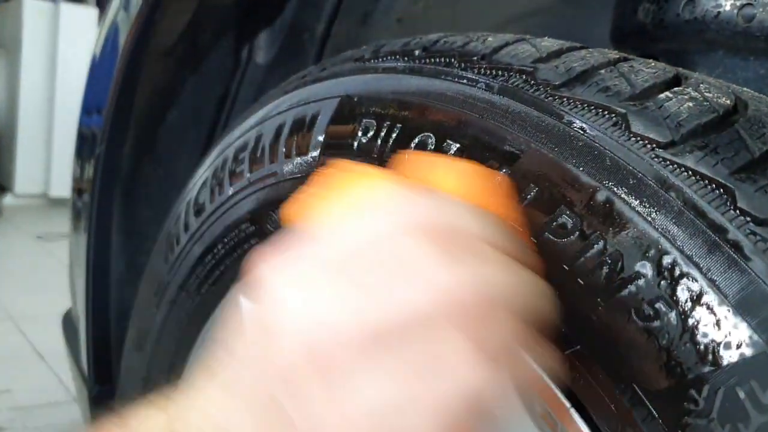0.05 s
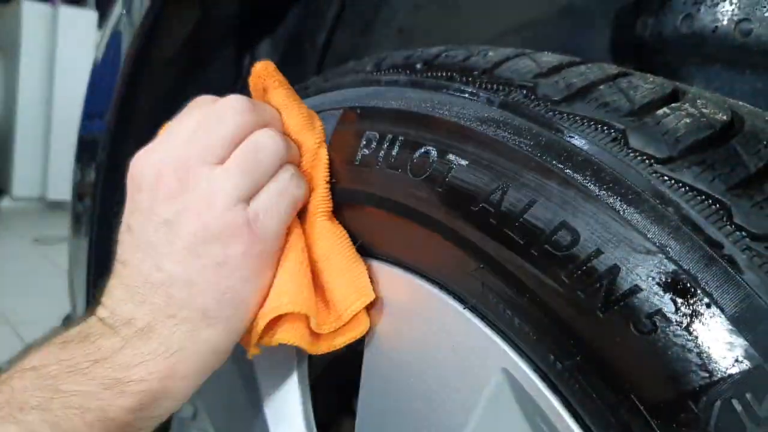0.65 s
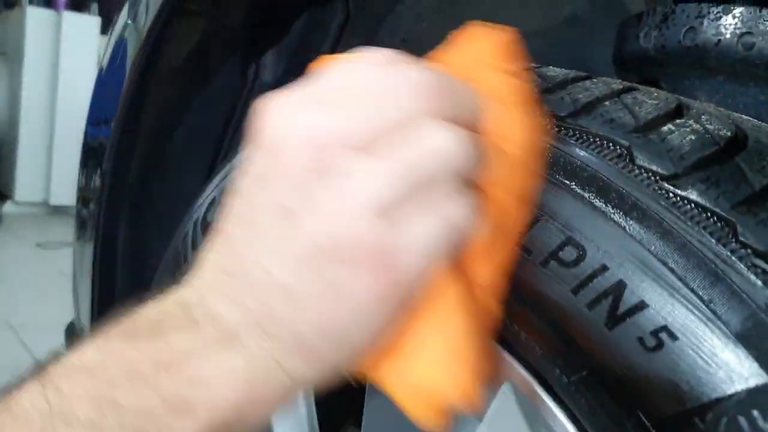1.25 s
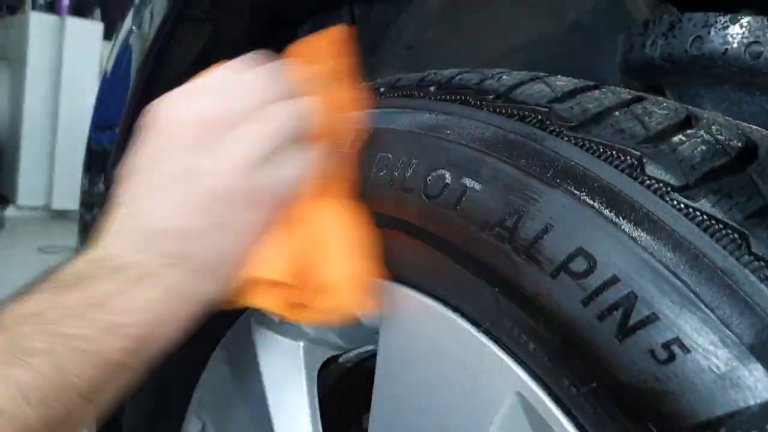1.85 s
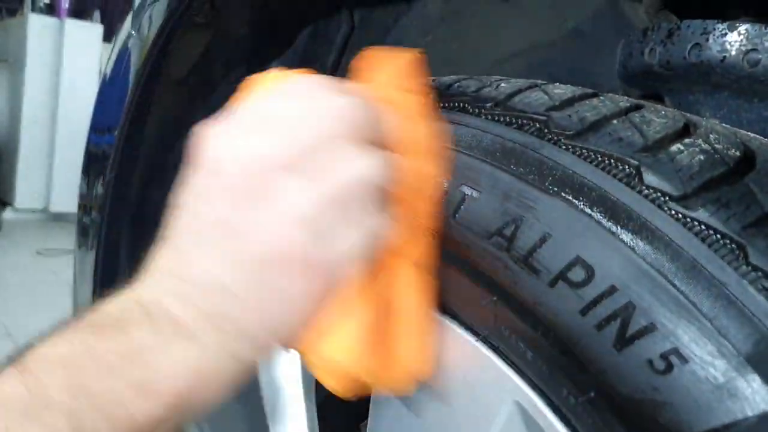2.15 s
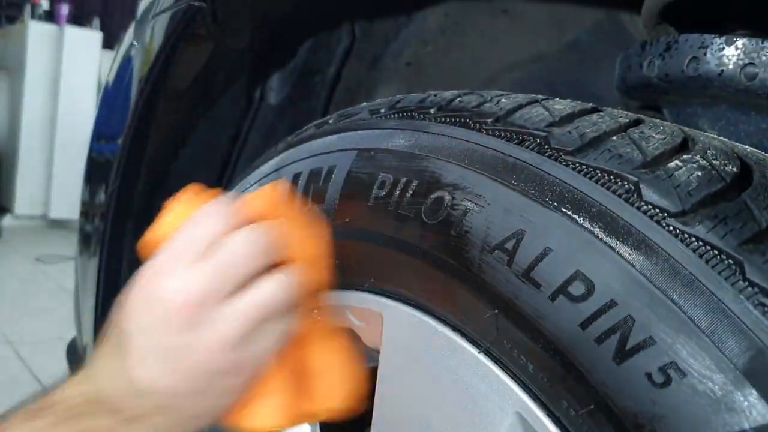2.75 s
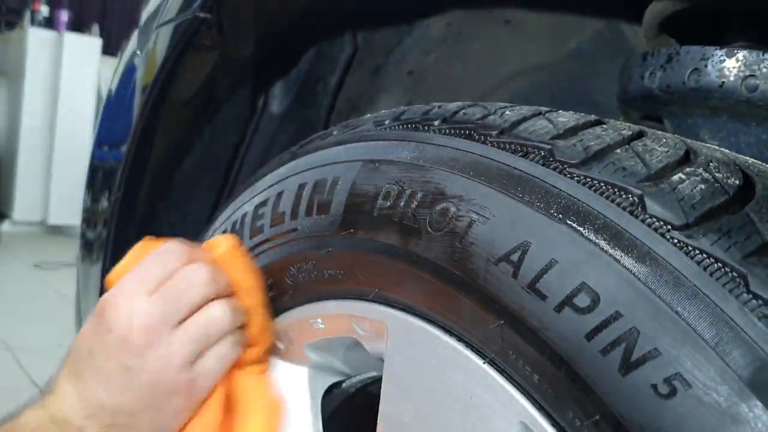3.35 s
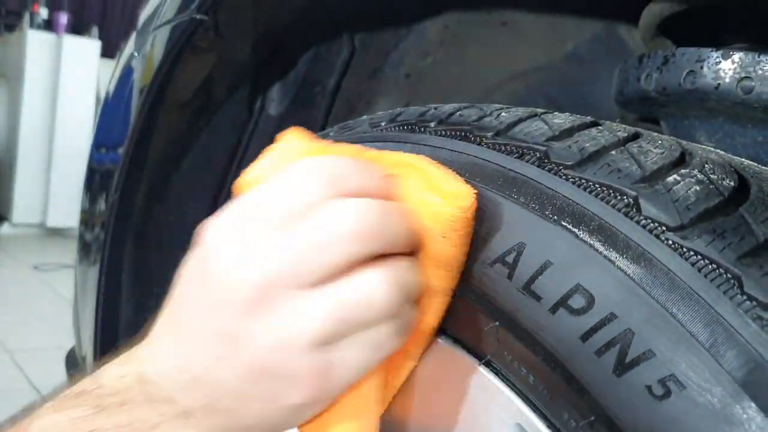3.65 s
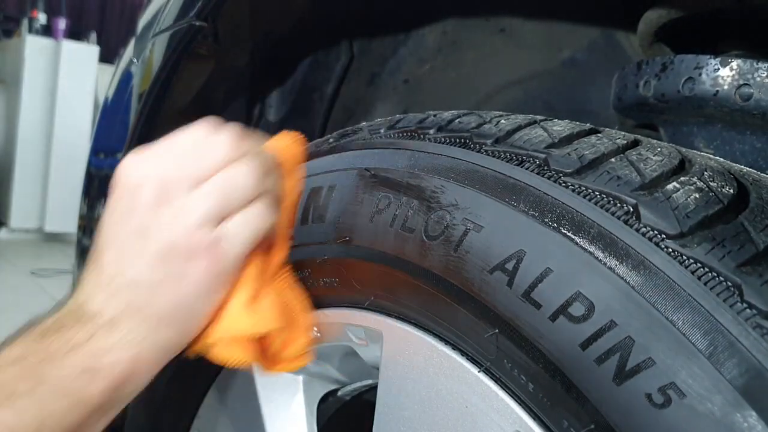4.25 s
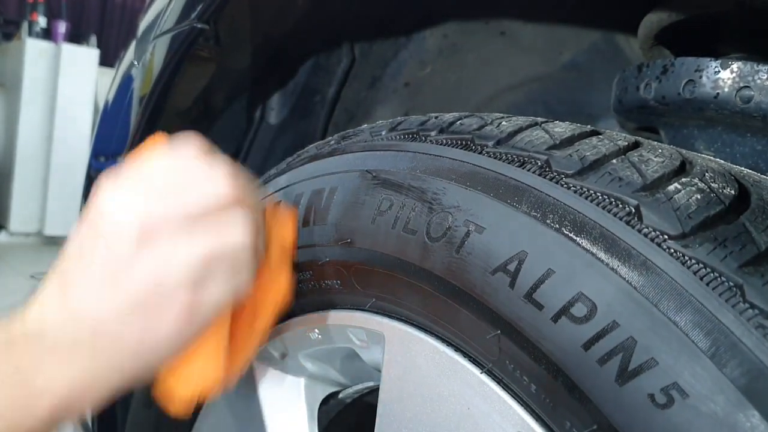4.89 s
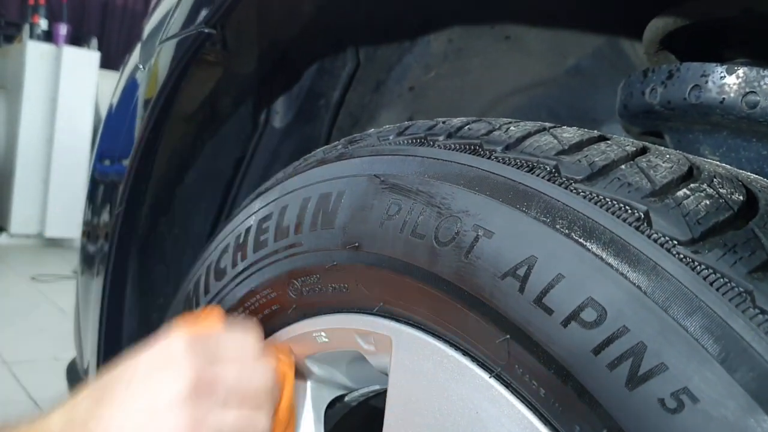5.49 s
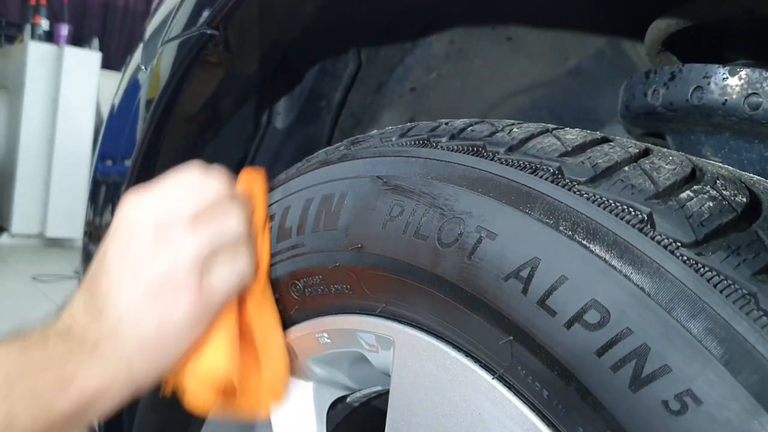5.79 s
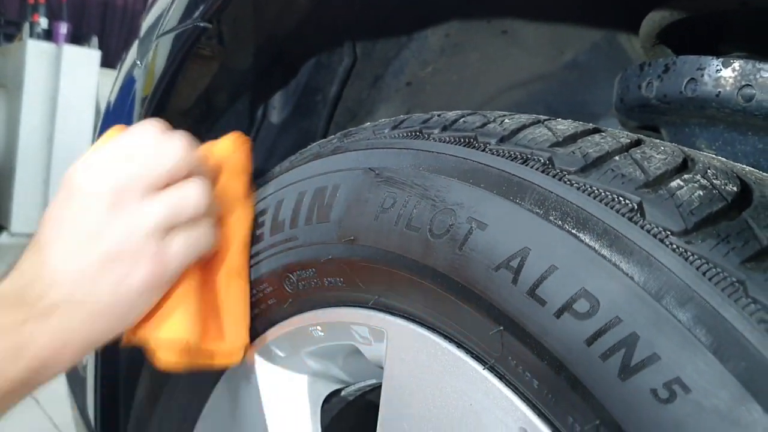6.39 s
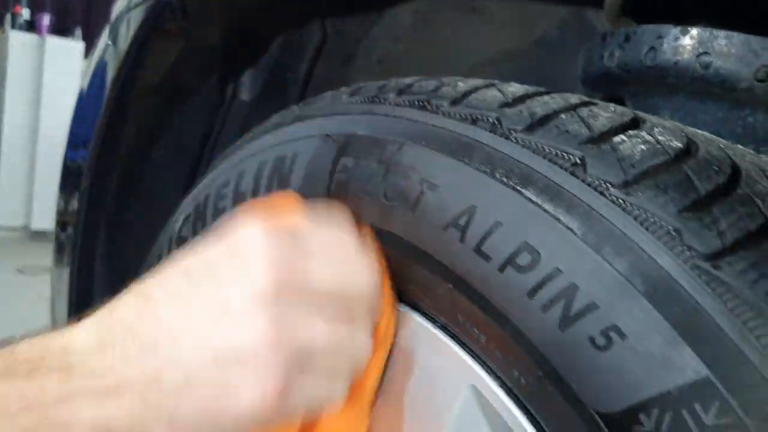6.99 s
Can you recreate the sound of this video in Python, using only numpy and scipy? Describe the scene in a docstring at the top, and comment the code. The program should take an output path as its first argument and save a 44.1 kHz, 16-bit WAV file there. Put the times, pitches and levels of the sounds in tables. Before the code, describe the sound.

A cloth is rubbed quickly to and fro over a wet rubber tyre, close and to the left. Each stroke gives a high squeak that rises and falls in pitch, over a swish and a fine hiss. After about four seconds the squeaks give way to quieter, drier wipes and short scuffs, with one sharp catch near the end. Moving air rumbles softly on the right microphone, and the workshop adds a slight echo.

```python
"""Rubber squeaks on the left as a cloth is rubbed to and fro over a wet tyre in a workshop.
The rubber sticks and slips, so each squeak rises and falls in pitch with the speed of the hand.
Under the squeaks the cloth swishes, its fibres hiss and the wet film gives a few tiny ticks.
Later strokes mostly swish and scuff. Moving air rumbles on the right microphone."""
import sys
import numpy as np
from scipy import signal
from scipy.fft import rfft, irfft, next_fast_len
from scipy.io import wavfile
from scipy.ndimage import map_coordinates

SR = 44100
rng = np.random.default_rng(int(sys.argv[2]) if len(sys.argv) > 2 else 0)


def master(y):
    """Save y as 16-bit WAV."""
    cut = np.clip(np.atleast_2d(y).T, -1, 1)
    pcm = np.round(cut * 32767)  # scale
    wavfile.write(sys.argv[1], SR, pcm.astype(np.int16))


N = 310023
TIME = np.arange(N) / SR

# Strokes on wet rubber: start_s, squeak_start_s, fastest_s, end_s, top_pitch_hz, arch_flatness,
# squeak_db, overtone_db, rub_db, hiss_db, press_time_s
STROKES = [(-.04, .045, .09, .19, 3150, 1.05, -49, -15, -49, -56.5, .016),
           (.265, .487, .55, .618, 1848, 1.0, -48.5, 0, -46, -57, .029),
           (.698, .704, .836, .909, 3042, .93, -40.5, -7, -42.5, -53, .02),
           (.897, .952, 1.027, 1.13, 3165, 1.2, -32, -16, -42.5, -55.5, .033),
           (1.14, 1.175, 1.285, 1.357, 3190, .85, -39, -9, -43.5, -52, .016),
           (1.366, 1.397, 1.457, 1.571, 3245, .89, -30, -18, -40, -50, .021),
           (1.601, 1.624, 1.7, 1.753, 2663, .92, -36, -9, -44.5, -56, .012),
           (1.76, 1.788, 1.869, 1.961, 3460, .99, -30, -18, -41.5, -53, .02),
           (2.012, 2.044, 2.146, 2.199, 3090, .79, -33.5, -12.5, -44, -52, .01),
           (2.223, 2.254, 2.295, 2.387, 3208, 1.0, -30, -17.5, -38.5, -53, .012),
           (2.46, 2.484, 2.58, 2.63, 3570, .87, -37.5, -12, -40.5, -51.5, .014),
           (2.668, 2.691, 2.759, 2.858, 3413, 1.09, -33, -19, -39.5, -53, .07),
           (2.926, 2.952, 3.0, 3.052, 2740, 1.2, -46, -15, -38.5, -54.5, .041),
           (3.04, 3.11, 3.1, 3.16, 2100, 1.0, -59, -1, -51.5, -60, .014),
           (3.17, 3.3, 3.335, 3.44, 1736, .9, -50, -4, -45.5, -61.5, .041),
           (3.45, 3.49, 3.54, 3.66, 2240, 2.6, -71, -5, -74, -79, .03),
           (3.703, 3.774, 3.849, 3.912, 2945, 1.0, -36.5, -16, -45, -53, .06),
           (3.945, 4.047, 4.085, 4.15, 2700, 1.24, -38, -17, -48, -53.5, .022),
           (4.157, 4.235, 4.245, 4.35, 1534, .86, -50, 0, -49.5, -56, .012),
           (6.43, 6.5, 6.6, 6.63, 985, .95, -55, -9, -64, -81, .03)]


def amp(db):
    """Turn decibels into a number to multiply by."""
    return 10 ** (np.asarray(db) / 20)


def unit(x):
    """Scale a signal to an average (rms) level of 1."""
    return x / np.sqrt(np.mean(x ** 2) + 1e-20)


def along(points, hz):
    """Read between (frequency_hz, value) points on a logarithmic frequency scale."""
    frequencies, values = np.transpose(points)
    return np.interp(np.log(hz + 1), np.log(frequencies + 1), values)


def wobble(rate):
    """A smooth random curve through `rate` new values a second."""
    return map_coordinates(rng.standard_normal(int(N * rate / SR) + 4), [TIME * rate])


def bump(peak_s, half_s):
    """A bell-shaped rise and fall around one moment."""
    return np.exp(-.5 * np.minimum(((TIME - peak_s) / half_s) ** 2, 100))


def swell(start_s, rise_s, hold_s, fade_s):
    """A level that rises in a straight line, holds, then dies away."""
    age = TIME - start_s
    return np.clip(age / rise_s, 0, 1) * np.exp(-np.clip((age - rise_s - hold_s) / fade_s, 0, 20))


def filtered(x, response):
    """Multiply each frequency in x by response(frequency)."""
    size = next_fast_len(N + SR // 2)
    return irfft(rfft(x, size) * response(np.fft.rfftfreq(size, 1 / SR)), size)[..., :N]


def coloured(x, colour):
    """Shape the bass and treble of x with (frequency_hz, gain_db) points."""
    return filtered(x, lambda hz: amp(along(colour, hz)))


def resonance(f, hz, width):
    """How something that rings at hz answers each frequency f."""
    return 1j * f * width / (hz * hz - f * f + 1j * f * width)


def background():
    """A faint, steady noise, separate on each side."""
    colour = [(30, 1.5), (120, -12.5), (250, 5), (500, 6.5), (1200, 0), (3000, -17), (5000, -17.5),
              (7500, -31), (10000, -14.5), (12600, -11.5), (15000, -36)]  # tone of the noise: frequency_hz, gain_db
    return amp(-77) * unit(coloured(rng.standard_normal((2, N)), colour))


def room_echo(x, build_s=.003):
    """The wheel arch and workshop throw back a blur of echoes; the treble dies first."""
    fade_times = [(300, 0.66), (800, 0.25), (2100, 0.21), (5500, 0.037), (13000, 0.085)]  # time an echo takes to fall 60 dB: frequency_hz, fade_s
    hz, t, spectrum = signal.stft(rng.standard_normal(SR // 2), SR, nperseg=256)
    fade = amp(-60 * t / along(fade_times, hz)[:, None])
    tail = signal.istft(spectrum * fade, SR, nperseg=256)[1]
    tail *= 1 - np.exp(-np.arange(len(tail)) / SR / build_s)
    return signal.fftconvolve(x, tail / np.linalg.norm(tail))[:N]


def near_echoes(x, fade_s=.0036, count=4):
    """Sound bounces off the tyre, arm and bodywork by paths that shift as the hand moves."""
    t = TIME[:SR // 30]
    paths = rng.standard_normal((count, len(t))) * np.exp(-t / fade_s)
    paths /= np.linalg.norm(paths, axis=1, keepdims=True)
    shares = np.array([wobble(8) for _ in range(count)])
    shares /= np.linalg.norm(shares, axis=0)
    return np.sum(shares * signal.oaconvolve(x[None], paths, axes=1)[:, :N], axis=0)


def air_rumble(rub):
    """Air buffets mainly the right microphone: a draught, a push from each wet stroke and some puffs."""
    puff_list = [(0.01, 0.058, -48.5), (0.274, 0.1, -50), (1.218, 0.4, -55.5), (3.058, 0.025, -44.5),
                 (4.019, 0.067, -47.5), (5.472, 0.024, -51.5), (5.697, 0.065, -53), (6.103, 0.098, -50),
                 (6.437, 0.29, -54.5), (6.847, .18, -48.5)]  # puffs of air: start_s, hold_s, level_db
    colour = [(15, -28), (25, -14), (34, 7.5), (50, -0.5), (68, 1), (88, 5.5), (110, -3), (160, -10.5),
              (230, -16.5), (400, -23), (700, -64)]  # tone of the moving air: frequency_hz, gain_db
    puffs = sum(amp(db) * swell(start, .015, hold, .088) for start, hold, db in puff_list)
    draught, arm_wind = amp(-63), amp(-15) * rub
    strength = np.sqrt(draught ** 2 + arm_wind ** 2 + puffs ** 2)
    gusty_noise = unit(amp(1.3 * wobble(30)) * coloured(rng.standard_normal(N), colour))
    return amp([[-22], [4.5]]) * strength * gusty_noise  # left, right


def wet_ticks(rise_s=.001, fade_s=.0047):
    """The film of water snaps with thin, high ticks."""
    snaps = [(.333, -41), (.363, -53), (4.795, -55), (4.905, -46), (5.952, -52)]  # snaps of the film: start_s, level_db
    out = np.zeros(N)
    for start, db in snaps:
        age = np.maximum(TIME - start, 0)
        out += amp(db) * (1 - np.exp(-age / rise_s)) * np.exp(-age / fade_s) * rng.standard_normal(N)
    return filtered(out, lambda f: resonance(f, hz=9900, width=2400) ** 2)


def scuffs(scrape_width_share=.57, ring_width_hz=200):
    """The cloth catches briefly: a broad scrape, and a hollow ring set by where the wheel is touched."""
    # Catches of the cloth: peak_s, scrape_db, half_length_s, scrape_hz, ring_hz, ring_db
    catches = [(0.463, -53, 0.003, 2600, 2550, -34), (2.962, -66, 0.01, 2800, 2980, -47),
               (3.233, -42, 0.0045, 1420, 3430, -45), (4.755, -43, 0.012, 1860, 1171, -47),
               (5.12, -53, 0.017, 2300, 455, -48), (5.478, -39.5, 0.013, 2100, 490, -51),
               (5.87, -57, 0.028, 1940, 1206, -47.5), (6.21, -26, 0.0061, 2160, 1360, -27),
               (6.597, -38.5, 0.01, 2114, 997, -42.5), (6.991, -39.5, 0.014, 2320, 1690, -42.5)]
    band = lambda f, hz, width: resonance(f, hz, width) ** 2 * np.sqrt(2 * SR / (np.pi * width))
    out = np.zeros(N)
    for peak, db, half, hz, ring_hz, ring_db in catches:
        push, noise = bump(peak, half), rng.standard_normal(N)
        ringing = np.maximum(push, amp(-17) * swell(peak - half, half, 0, fade_s=.047))
        out += amp(db - 3) * filtered(push * noise, lambda f: band(f, hz, scrape_width_share * hz))
        out += amp(ring_db - 1.5) * filtered(ringing * noise, lambda f: band(f, ring_hz, ring_width_hz))
    return out


def hand_speed(start, fastest, end, flatness):
    """The hand speeds up and slows down in one stroke: an arch from 0 to 1 and back."""
    from_peak = np.maximum((fastest - TIME) / (fastest - start), (TIME - fastest) / (end - fastest))
    moving, speed = from_peak < 1, np.zeros(N)
    speed[moving] = np.abs(np.cos(np.pi / 2 * np.abs(from_peak[moving]) ** flatness))
    return speed


def settling(level, trail_db, fade_s=.17):
    """Add a weak, fading trail: the cloth keeps rustling while the hand turns."""
    carry = np.exp(-1 / (fade_s * SR))
    trail = signal.lfilter([1 - carry], [1, -carry], level)
    return np.hypot(level, amp(trail_db) * trail)


def wet_stroke_levels(lag_s=.0037):
    """Rubbing and hiss grow with speed and pressure; the loose cloth lags behind the hand."""
    rub, hiss = np.zeros((2, N))
    for start, _, fastest, end, _, flatness, _, _, rub_db, hiss_db, press_s in STROKES:
        speed = hand_speed(start, fastest + lag_s, end + lag_s, flatness)
        on = speed > 0
        pressure = 1 - np.exp(-(TIME[on] - start) / press_s)
        rub[on] += amp(rub_db) * pressure * speed[on] ** .61
        hiss[on] += amp(hiss_db) * pressure * speed[on] ** .83
    return settling(rub, trail_db=-15.5), settling(hiss, trail_db=-12.5)


def dry_wipe_levels(rise_s=.038, fall_s=.025):
    """On drier rubber, rubbing and hiss swell into one push, then trail off."""
    wipes = [(4.33, 0.014, -49, -77), (4.762, .12, -49, -58.5), (5.125, 0.063, -47.5, -58),
             (5.484, 0.12, -46.5, -61), (5.879, 0.14, -49, -59), (6.215, .11, -42.5, -57),
             (6.592, .11, -44.5, -57.5), (6.988, .13, -50.5, -60.5)]  # light wipes: peak_s, lead_in_s, rub_db, hiss_db
    rub, hiss = np.zeros((2, N))
    for peak, lead, rub_db, hiss_db in wipes:
        from_peak = np.maximum((peak - TIME) / rise_s, (TIME - peak) / fall_s)
        push = np.exp(-np.minimum(from_peak, 20))
        trail = amp(-8) * swell(peak - fall_s, fall_s, 0, fade_s=.069)
        # Rubbing is weaker until the cloth has landed.
        landed = amp(-12.5 * np.clip((peak - lead - TIME) / fall_s + 1, 0, 1))
        rub += amp(rub_db) * landed * np.maximum(push, trail)
        # Fibres brush along before and after the push.
        brush = amp(-7) * swell(peak - lead, lead / 2, lead / 2, fall_s)
        brush_trail = amp(-13) * swell(peak - lead, lead, 0, fade_s=.12)
        hiss += amp(hiss_db) * np.maximum(push ** 2, np.maximum(brush, brush_trail))
    return rub, hiss


def friction(grain_db, grain_rate):
    """Noise broken into tiny slips of uneven size."""
    return unit(rng.standard_normal(N) * amp(grain_db * wobble(grain_rate)))


def wheel(x, ring_db):
    """Rubbing is heard directly and through the ringing wheel."""
    notes = [(506, 85, 3.5), (1132, 71, 4), (1340, 34, 0.5), (1950, 44, 2), (2466, 350, 5.5),
             (2640, 210, 3)]  # where the wheel rings: pitch_hz, width_hz, gain_db
    ringing = lambda f: sum(amp(db) * resonance(f, hz, width) for hz, width, db in notes)
    return filtered(x, lambda f: 1 + amp(ring_db) * ringing(f))


def rubbing(wet_rub, wet_hiss):
    """The cloth drags over the rubber: a coarse swish under the fine hiss of its fibres."""
    # Tone of wet rubbing, dry rubbing and fibre hiss: frequency_hz, gain_db
    wet_colour = [(150, -29.5), (240, -19), (350, -2.5), (500, 0.5), (720, -1.5), (1200, 3), (2000, 3),
                  (3000, 4.5), (3700, 1), (4500, -2.5), (6300, -16), (7500, -21), (16000, -57.5)]
    dry_colour = [(150, -27.5), (240, -28.5), (330, -10), (500, -11), (700, -2.5), (900, -5), (1200, -0.5),
                  (1750, -2.5), (2600, -9), (3600, -5), (5000, -13.5), (7500, -39), (16000, -49)]
    fibre_colour = [(1000, -10), (2800, 5), (4500, 5.5), (6400, 2), (7400, -4), (8500, -1), (9600, -0.5),
                    (11000, 0.5), (12600, 5), (13600, -7.5), (15700, -28.5)]
    dry_rub, dry_hiss = dry_wipe_levels()
    wet_noise = coloured(friction(grain_db=2, grain_rate=700), wet_colour)
    dry_noise = coloured(friction(grain_db=1.5, grain_rate=420), dry_colour)
    fibre_noise = coloured(friction(grain_db=1.5, grain_rate=2700), fibre_colour)
    wet_swish = wet_rub * unit(wheel(wet_noise, ring_db=-14.5))
    dry_swish = dry_rub * unit(wheel(dry_noise, ring_db=-1.5))
    hiss = (wet_hiss + dry_hiss) * unit(fibre_noise)
    return amp(1) * wet_swish + amp(2) * dry_swish + amp(3.5) * hiss


def squeaks(catch_s=.012, stall_speed=.21):
    """Rubber sticks and slips: the pitch follows the hand and blooms into a whistle at full speed."""
    grips = [(.057, -39, 0.0055), (0.763, -34.5, 0.0037), (1.07, -22.5, 0.0038), (1.222, -32, .006),
             (1.433, -24, 0.0063), (1.527, -35, 0.014), (1.828, -27.5, 0.01), (2.273, -25.5, 0.0057),
             (2.331, -26.5, 0.0026), (2.546, -31, 0.0036), (2.797, -31.5, .004), (2.984, -30.5, 0.0019),
             (3.387, -43, .005), (3.785, -35.5, .0035), (4.096, -34, .013)]  # hardest grips, where the squeak flares: peak_s, level_db, half_length_s
    resonances = [(1950, 150, 2), (2853, 84, 1)]  # pitches the rubber makes louder: pitch_hz, width_hz, gain_db
    colour = [(300, -10), (800, 1), (1300, 2), (2000, 0), (2800, 1), (3450, 1), (3750, -3), (6400, -3),
              (7400, -13), (9500, -4), (12600, -3), (14000, -16)]  # tone of the squeak: frequency_hz, gain_db
    pitch, main_level, overtone_level = np.zeros((3, N))
    for start, squeak_start, fastest, end, top_hz, flatness, db, overtone_db, *_ in STROKES:
        on = (TIME > start) & (TIME < end)
        speed = hand_speed(start, fastest, end, flatness)[on]
        pitch[on] = top_hz * speed
        # The rubber catches suddenly and lets go as the cloth slows down.
        caught = np.clip((TIME[on] - squeak_start) / catch_s, 0, 1)
        sliding = caught * np.clip((speed - stall_speed) / .22, 0, 1) * speed ** .6
        # Slow slips are jerky: a weaker tone, rich in overtones.
        jerky = amp(min(db - 2, db + overtone_db + 9))
        main_level[on] = sliding * np.maximum(amp(db) * speed ** 2, jerky)
        overtone_level[on] = sliding * amp(db + overtone_db)
    main_level *= amp(sum(db / (1 + ((pitch - hz) / width) ** 2) for hz, width, db in resonances))
    jitter = 1 + .02 * wobble(900) + .009 * wobble(170)
    phase = 2 * np.pi * np.cumsum(pitch * jitter) / SR
    flutter = lambda: unit(amp(4.5 * wobble(280) + 3.36 * wobble(70)))
    flares = sum(amp(db) * bump(peak, half) for peak, db, half in grips)
    tone = 1.15 * np.maximum(main_level * flutter(), flares) * np.sin(phase)
    # Many patches of cloth slip slightly out of step and roughen the tone at k times the pitch.
    rough = lambda k, rate: wobble(rate) * np.sin(k * phase) + wobble(rate) * np.cos(k * phase)
    tone += (.15 * main_level + .35 * overtone_level) * rough(1, 800)
    for k, db in ((2, 0), (3, -7), (4, -13)):
        overtone = 1.4 * flutter() ** .8 * np.sin(k * phase) + .5 * rough(k, 500)
        tone += amp(db) * overtone_level * overtone
    return coloured(np.sqrt(2) * tone, colour)


def scene():
    """The left microphone faces the cloth; the right hears it later, shaded and mostly as echoes."""
    shade = [(200, 18.5), (400, -4), (700, -5.5), (1300, -9.5), (2400, -11.5), (4400, -11.5), (8000, -16),
             (10000, -2.5), (12500, -16.5)]  # tone on the shaded right side: frequency_hz, gain_db
    delay_s, dull_above_hz = 6e-5, 2500
    rub, hiss = wet_stroke_levels()
    cloth = squeaks() + rubbing(rub, hiss) + scuffs() + wet_ticks()
    left = cloth + amp(-17) * near_echoes(cloth) + amp(-15) * room_echo(cloth)
    # Treble bends round to the far side less easily than bass.
    bent = filtered(cloth, lambda f: np.exp(-2j * np.pi * f * delay_s) / (1 + 1j * f / dull_above_hz))
    right = coloured(amp(-3) * bent + near_echoes(cloth) + amp(-13) * room_echo(cloth), shade)
    return np.array([left, right]) + background() + air_rumble(rub)


def record(dry):
    """Cut off the very highest treble."""
    return filtered(dry, lambda hz: hz < 15720)


dry = scene()
out = record(dry)
master(out)
```